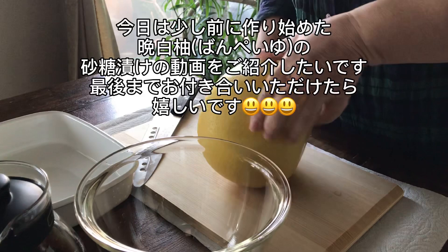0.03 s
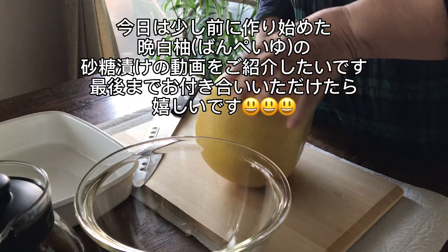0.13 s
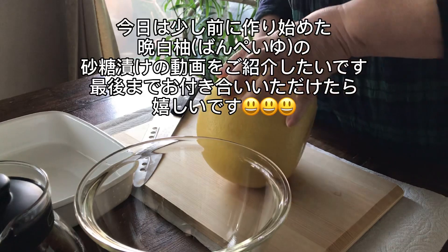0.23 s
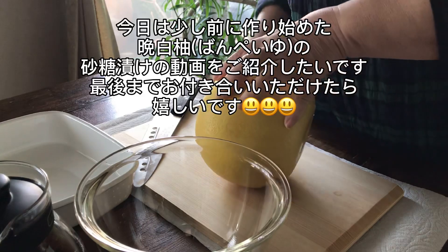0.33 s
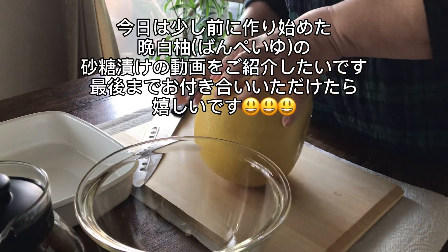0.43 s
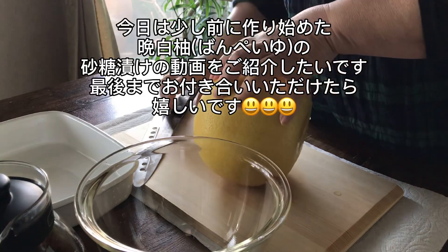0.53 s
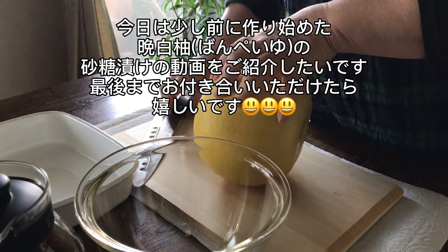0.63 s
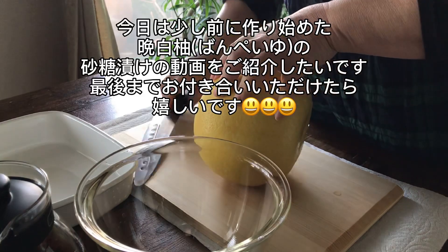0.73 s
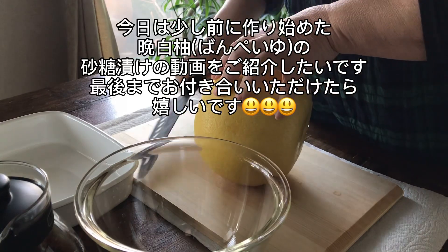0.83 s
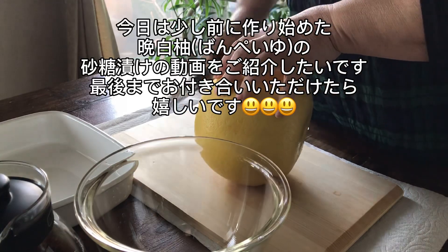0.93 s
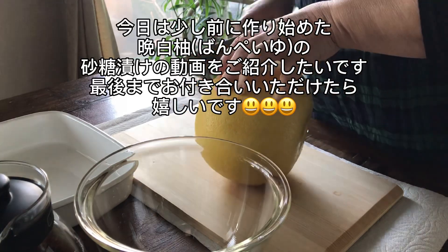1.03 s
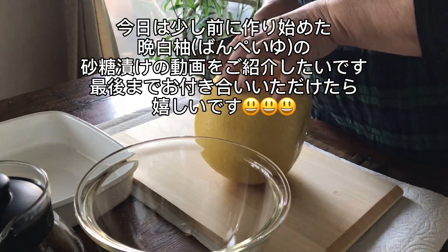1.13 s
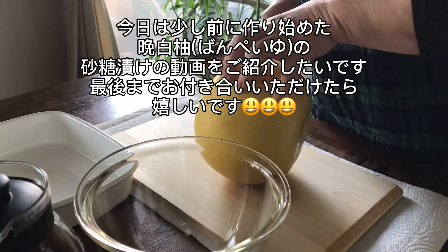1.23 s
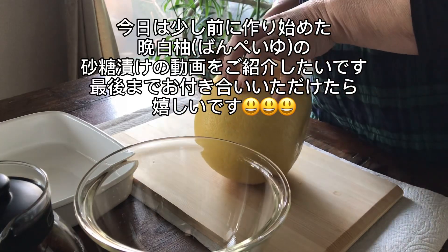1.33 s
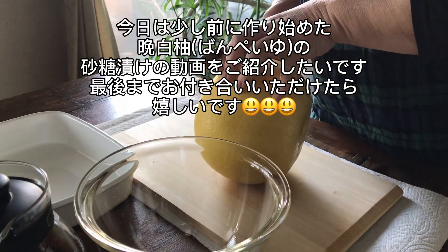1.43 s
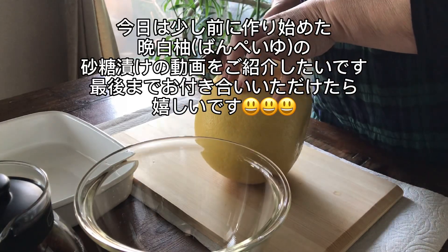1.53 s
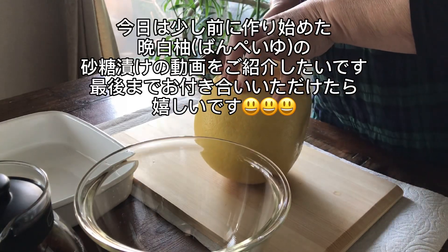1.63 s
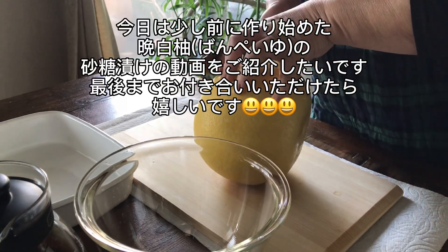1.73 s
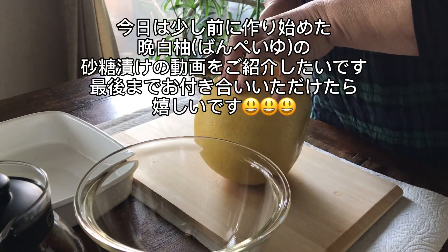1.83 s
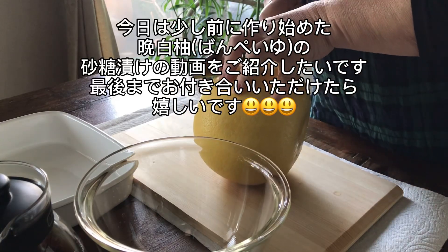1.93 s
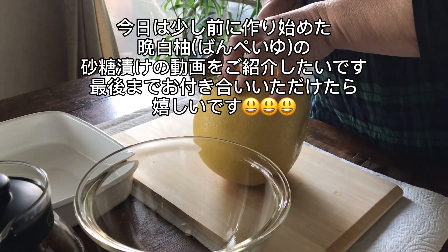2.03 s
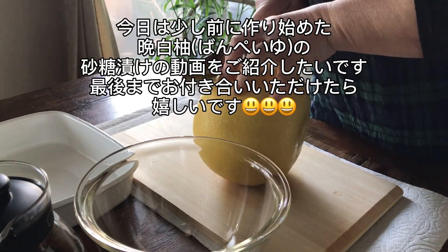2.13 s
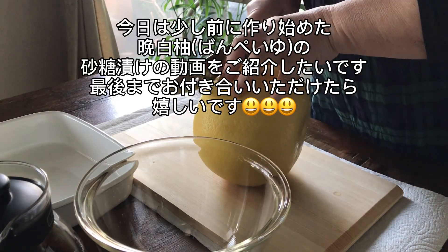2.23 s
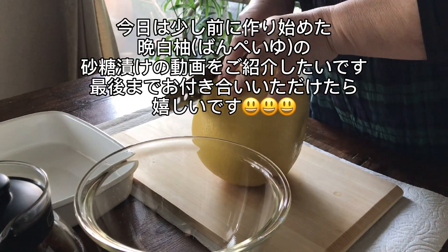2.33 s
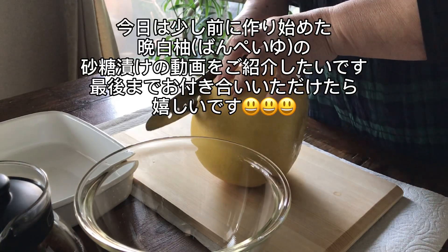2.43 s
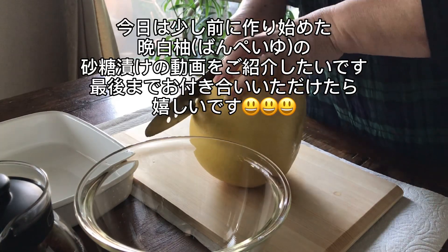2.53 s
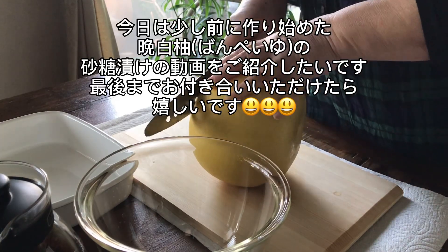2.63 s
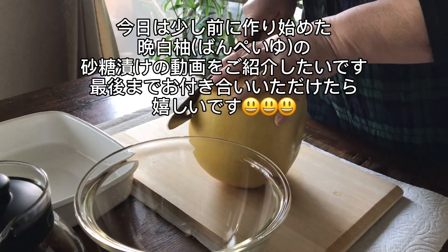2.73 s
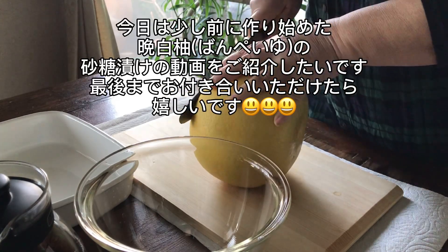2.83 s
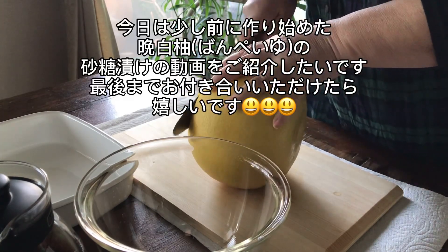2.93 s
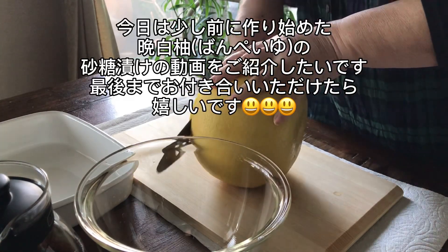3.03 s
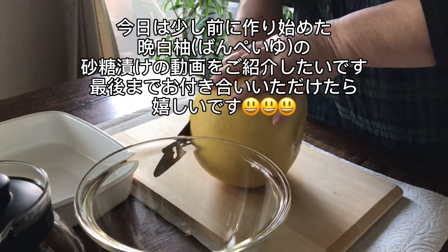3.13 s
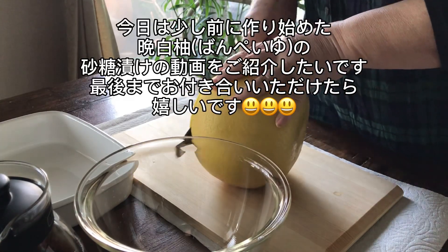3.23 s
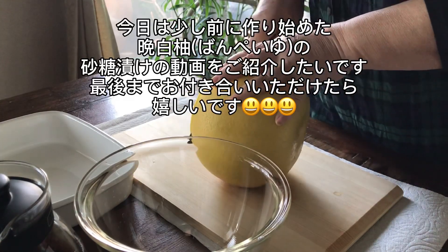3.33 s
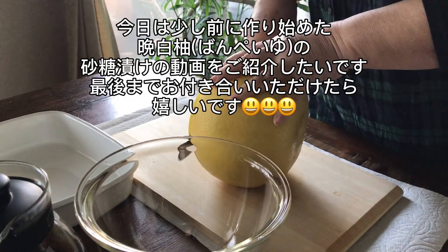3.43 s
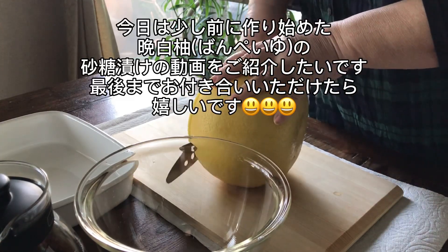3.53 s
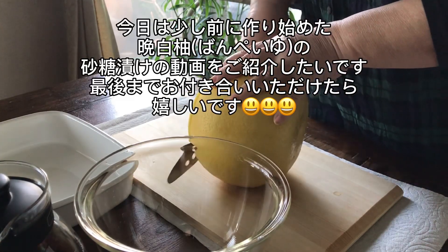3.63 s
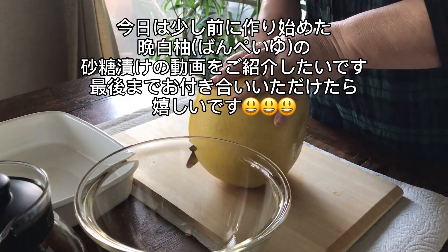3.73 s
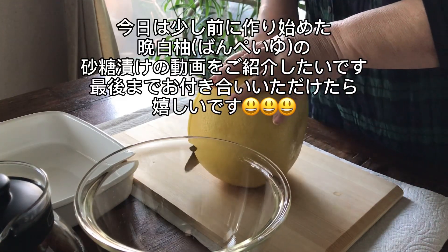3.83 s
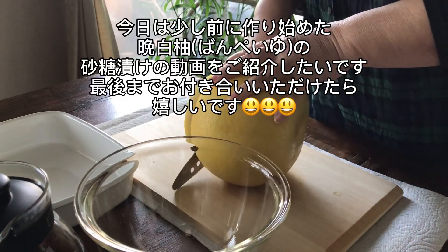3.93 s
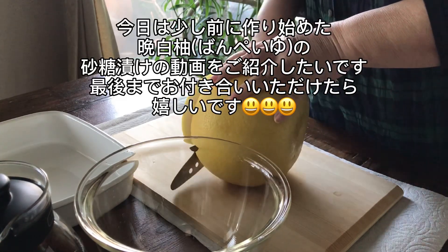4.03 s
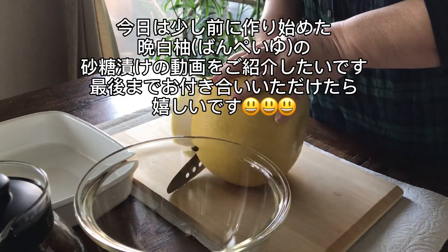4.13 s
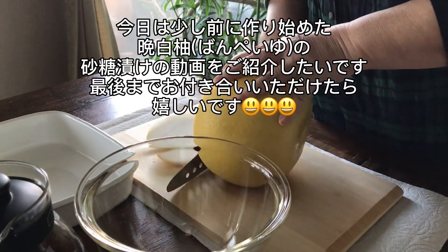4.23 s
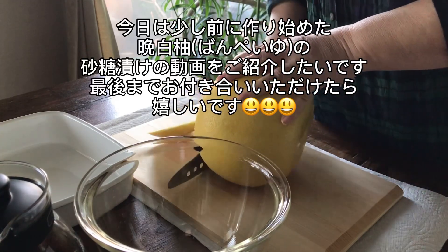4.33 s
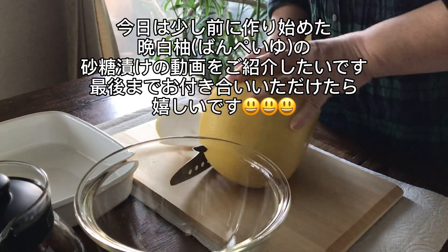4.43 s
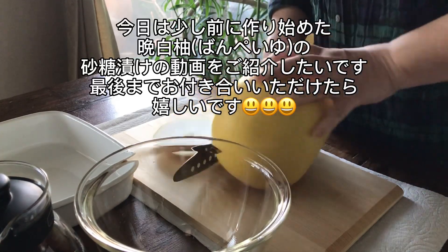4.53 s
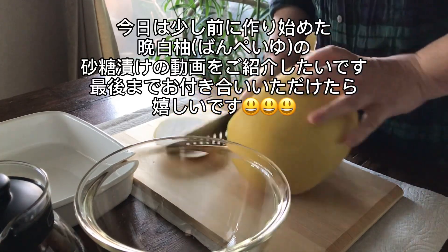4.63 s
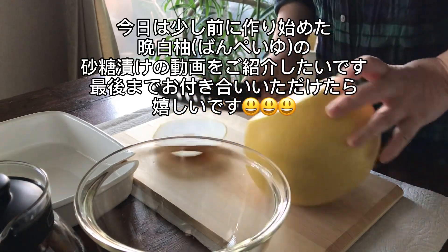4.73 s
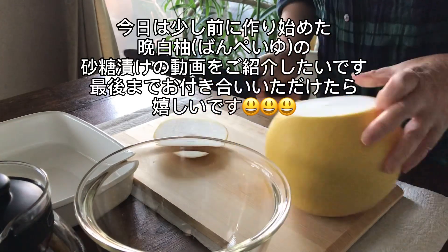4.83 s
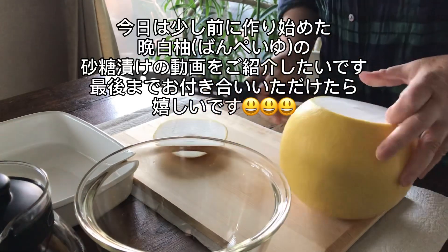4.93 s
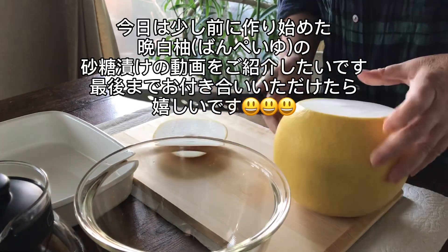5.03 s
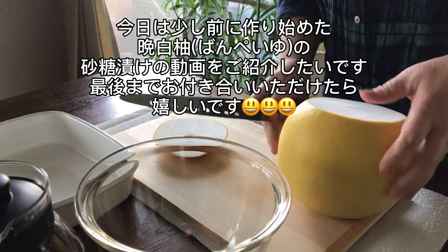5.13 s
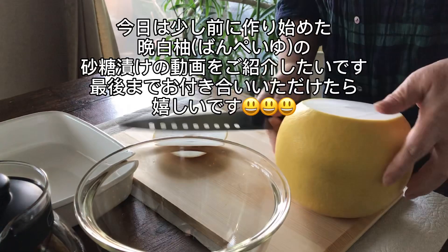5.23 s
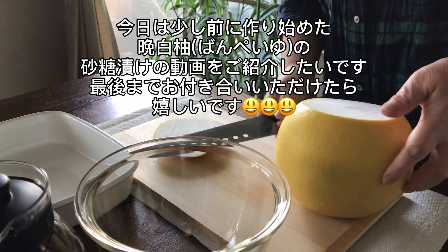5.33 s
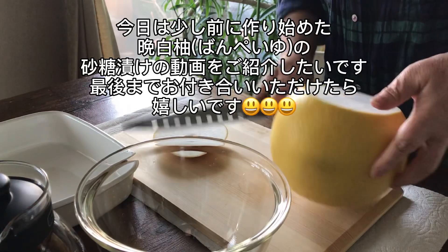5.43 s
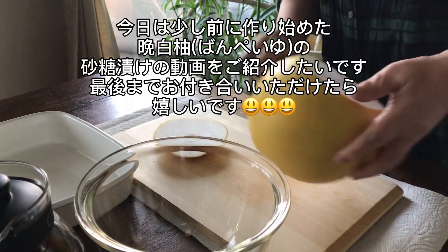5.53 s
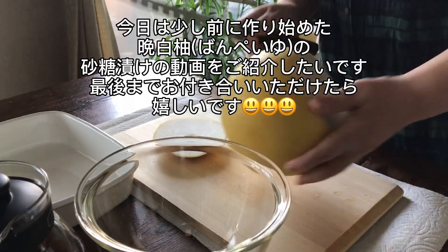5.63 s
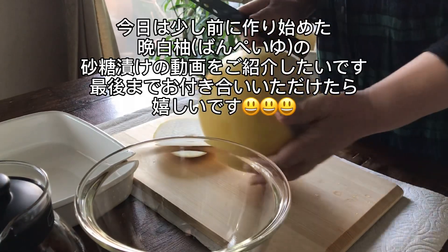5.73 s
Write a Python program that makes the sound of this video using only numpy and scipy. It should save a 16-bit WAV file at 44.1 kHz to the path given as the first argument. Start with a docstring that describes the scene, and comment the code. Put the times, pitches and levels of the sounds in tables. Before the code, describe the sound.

Close view of a quiet home kitchen with low room murmur. Hands softly rub and shift a heavy fruit on a wooden board, with a faint double tap. After about two seconds a knife saws in short, uneven, crunchy rasps with damp hiss. Two hard knocks at the end of the cut and a clacking landing follow, then small taps and dull shifting as the fruit is moved.

```python
"""Soft rubbing of hands on a large fruit opens the scene; then a knife saws through its thick rind in a kitchen.
The strokes are trains of random slips with scrape and wet hiss, each with its own arch of force.
Knocks, and landings of fruit and cut cap on the wooden board, are short pushes into dying modes, with bright ticks.
Shaped grains and noise make the hands, the low table rumble and a faint thin whistle.
Sparse echoes make the quiet kitchen, and drifting noise its air."""
import sys
import numpy as np
from scipy import signal
from scipy.fft import rfft, irfft
from scipy.io import wavfile
from scipy.ndimage import uniform_filter1d

SR = 44100
rng = np.random.default_rng(int(sys.argv[2]) if len(sys.argv) > 2 else 0)


def store_pcm(level_fs):
    """Save levels as 16-bit WAV."""
    pcm = np.round(np.clip(level_fs, -1, 1) * 32767).astype(np.int16)
    wavfile.write(sys.argv[1], SR, np.atleast_2d(pcm).T)


N = 254898  # length in samples

# strokes of the knife: start_s, rise_s (to full force), fall_s (from there to the stop), force_db,
# first_db and last_db (force missing at start and stop), scrape_db and hiss_db (relative to the force),
# wood (share of the edge on wood, 0-1)
KNIFE_STROKES = [ (2.07, 0.13, 0.014, -58, 19, 11, -12.5, -7, 0),
                 (2.19, 0.033, 0.036, -50, 9, 0.5, -11.5, -12, 0),
                 (2.26, 0.072, 0.091, -41.5, 5.5, 15, -13.5, -14, 0.19),
                 (2.44, .025, 0.026, -66, 4, 6, -5, -2, 0.45),
                 (2.53, 0.053, 0.028, -62.5, 6, 4, -10, -6, 0.6),
                 (2.611, 0.16, 0.03, -54, -0.5, 14, -6.5, -8, 0),
                 (2.867, 0.097, 0.095, -41.5, 14.5, 17, -9.5, -14, 0),
                 (3.128, 0.14, 0.036, -57, 3, 13, -11, -12.5, 0.04),
                 (3.342, 0.078, 0.11, -43, 13, 8, -14, -20, 0.14),
                 (3.6, .1, 0.027, -54, 3, 1.5, -13.5, -16.5, 0.09),
                 (3.781, 0.059, 0.019, -43, 13, -2, -15.5, -25, 0.25),
                 (3.87, 0.03, 0.044, -37, -6, 13, -17.5, -24, 0.75),
                 (3.999, 0.056, 0.018, -46.5, 17, -3.5, -21.5, -29, 0.5),
                 (4.074, 0.047, 0.048, -43.5, -3, 19, -12, -20.5, 0.7), ]
# slips shaking the fruit: pitch_hz, relative level_db (per Hz)
SLIP_SPECTRUM = [(35, -41), (60, -8), (123, -3.5), (163, -5.5), (256, -3), (372, -0.5), (643, -2),
                 (1470, -15.5), (1670, -17), (2500, -23), (3250, -37), (5500, -120)]
# blade scraping in the rind: pitch_hz, relative level_db (per Hz)
RIND_SCRAPE_SPECTRUM = [(900, -27), (1650, 5), (2150, -1.5), (2600, 4), (2950, 2), (3300, 1.5), (4000, 2),
                        (4600, 0.5), (5200, -3.5), (5870, -2), (7200, -7.5), (9500, -15)]
# blade edge against wood: pitch_hz, width_hz (of one filter pass), relative level_db
WOOD_EDGE_PEAKS = [(2880, 3000, 2), (4130, 180, 6), (5050, 470, 6), (5870, 200, 5), (6900, 680, 0.5),
                   (8500, 590, -10)]
# bursting cells, also skin on rind: pitch_hz, relative level_db (per Hz)
HISS_SPECTRUM = [(3000, -24), (6000, -4), (9000, -0.5), (12500, 0), (14500, -3), (16000, -3.5)]

# jolts through fruit and board: start_s, blow_db (dry peak), contact_ms, boom_db (before the soft rise)
BODY_KNOCKS = [(.658, -40.5, 4.9, -68), (2.067, -39, 2.1, -37), (2.194, -46, 2, -41.5),
               (2.337, -38.5, 1.1, -45), (2.615, -54, 1.3, -63), (2.976, -35, 0.67, -34.5),
               (2.985, -34, 2.9, -43), (3.602, -49, 1.4, -78), (3.797, -43, 2.3, -63),
               (3.8755, -20, 1.29, -33), (4.0757, -20, 1.33, -70), (4.097, -32, 1.5, -60),
               (4.227, -31, 1.9, -48), (4.27, -43.5, 1.8, -55), (5.496, -43, 4.8, -62),
               (5.632, -40, 1.03, -55)]
# the fruit, then the cap, then the fruit again, landing on the board: start_s, tick_db (dry peak),
# cycle_ms (one push and rebound), boom_db (before the soft rise)
BOARD_LANDINGS = [(.552, -47.5, 0.41, -65), (.657, -43, 0.46, -54), (4.203, -41.5, 0.51, -71),
                  (4.221, -51, 0.75, -61), (4.2265, -21.5, 0.47, -22.5), (4.268, -42, 0.23, -56),
                  (4.379, -33.5, 0.52, -28), (4.385, -34, 0.32, -44), (4.508, -37.5, 0.46, -37.5),
                  (4.61, -42, 0.37, -34.5), (4.699, -45.5, 0.35, -49), (4.77, -54, 0.31, -75),
                  (4.887, -39.5, 0.68, -37)]
# what fruit and board ring with: pitch_hz, relative level_db, t60_s
BODY_MODES = [(202, -5, 0.071), (250, -4, 0.05), (333.6, 13.5, 0.037), (513, -25, 0.074), (552, 6, 0.029),
              (804, -12.5, 0.11), (1130, -2, 0.033), (1540, -8, 0.038)]
# what the landings ring with, tuned to the cap: pitch_hz, relative level_db, t60_s
CAP_MODES = [(532, 26, 0.031), (1000, 15, 0.013), (1250, -7.5, 0.026), (1370, -11, 0.029),
             (1950, -13, 0.019), (2110, -3.5, 0.014), (2190, -24, 0.012), (2500, -2.5, 0.011),
             (3000, -4.5, .012), (4100, -4, 0.017)]
# lowest modes of the board on the table: pitch_hz, relative level_db, t60_s
BOARD_MODES = [(133, 0, .25), (167, -7, .2), (334, -20, .2), (118, -8, .2), (205, -12, .08)]
# small bright ticks of blade and fingernails: start_s, level_db (dry peak), centre_hz, width (share of centre)
BRIGHT_TICKS = [(.35, -61, 6000, .6), (.554, -56, 2330, .1), (.657, -53, 2820, 0.078),
                (.658, -51, 1640, .08), (1.157, -44, 13100, 0.54), (1.158, -56, 5830, 0.076),
                (1.16, -54, 4000, 0.55), (4.183, -56, 3480, 0.096), (4.226, -34.5, 6850, 0.55),
                (4.381, -47.5, 7700, 1), (4.785, -58, 5500, .4), (4.99, -58, 10000, .6),
                (5.049, -55, 3750, 0.79), (5.082, -59, 6600, .4), (5.12, -62, 4000, .6),
                (5.501, -53, 1450, .1), (5.25, -55.5, 10100, .6), (5.341, -52.5, 11500, 0.93),
                (5.646, -54, 2220, 0.073), (5.667, -49.5, 2550, 0.17)]

# hands touching and shifting the fruit: strongest_s, swell_s, fade_s,
# shift_db (dull shifting), brush_db (brushing on wood), skin_db (skin hiss)
HAND_TOUCHES = [ (.062, 0.09, .06, -78, -72, -64), (.2, 0.12, .06, -86, -79, -70),
                (.266, 0.067, 0.029, -62, -83, -82), (0.554, 0.034, 0.17, -59, -63.5, -70),
                (.62, 0.092, 0.071, -84, -66, -84), (0.663, .02, 0.084, -51.5, -59.5, -74),
                (.775, 0.11, 0.043, -76, -73, -68), (.82, 0.054, 0.22, -69, -71, -93),
                (.95, 0.2, 0.21, -75, -75, -68.5), (1.11, .08, 0.6, -80, -77, -87),
                (1.51, 0.056, .1, -67.5, -84, -70), (2.034, 0.067, 0.18, -68, -81, -80),
                (4.26, 0.21, 0.18, -55.5, -65.5, -90), (4.85, 0.75, 0.096, -70, -81, -77),
                (4.888, 0.053, 0.049, -55, -61.5, -82), (4.985, .08, .08, -72, -78, -73),
                (5.08, 0.091, 0.33, -67.5, -81, -74.5), (5.355, 0.13, 0.024, -65.5, -78, -80),
                (5.505, 0.067, 0.23, -58, -77, -107), (5.64, 0.12, 0.1, -53, -78, -88),
                (5.67, 0.041, 0.1, -56, -60, -77), (5.73, 0.13, .25, -56, -77, -79), ]
# steady grip of the hands: shift_db, brush_db, skin_db
GRIP_DB = (-70.5, -78.5, -85.5)
# dull shifting of the fruit: pitch_hz, relative level_db (per Hz)
SHIFT_SPECTRUM = [(100, -5), (290, -1), (540, -3.5), (900, -10.5), (1500, -16.5), (3000, -72.5)]
# brushing on wood: pitch_hz, relative level_db (per Hz)
BRUSH_SPECTRUM = [(700, -4), (1500, 5.5), (2500, 1), (4000, -3.5), (6500, -8.5), (10000, -22)]
# low rumble through the table: pitch_hz, relative level_db (per Hz)
RUMBLE_SPECTRUM = [(25, -8), (36, -11.5), (49, -9.5), (65, -10.5), (95, -6), (140, -18), (300, -49)]
# loudness of that rumble over time: time_s, level_db
RUMBLE_LEVEL = [(0.0, -59.5), (0.89, -59), (1.72, -64.5), (2.4, -59.5), (2.83, -64.5), (2.99, -53),
                (3.27, -62), (3.85, -60), (3.9, -68), (3.99, -67), (4.09, -55), (4.18, -61), (4.23, -50),
                (4.4, -68), (4.44, -56.5), (4.96, -55), (5.59, -66.5), (5.78, -53.5)]
# loudness of a faint thin whistle: time_s, level_db
WHISTLE_LEVEL = [(.78, -95), (.81, -76), (1.0, -77), (1.05, -95)]
# resonance of the whistle: pitch_hz, width_hz (of one filter pass), relative level_db
WHISTLE_RESONANCE = [(3030, 90, 0)]

# dying time of the kitchen's echoes: pitch_hz, t60_s
KITCHEN_DECAY = [(120, 0.36), (300, 0.29), (1000, 0.2), (4000, 0.11), (12000, 0.09)]
# murmur of the house and microphone hiss: pitch_hz, relative level_db (per Hz)
AIR_SPECTRUM = [(20, -15), (45, -3.5), (95, -2), (200, -4), (330, -7.5), (500, -21), (1000, -16),
                (1600, -23), (3200, -29), (6300, -33.5), (12500, -37), (16000, -42)]
# dips of the microphone housing: pitch_hz, width_hz, gain_db
HOUSING_DIPS = [(4960, 97, -5.5), (7650, 500, -4), (10320, 770, -5.5)]

BITE_S, LET_GO_S = 0.0096, 0.013  # the blade grips quickly and slides to rest
ROUNDING = 1.72  # 1 = pointed top of the force, 2 = round arch
HISS_LEAD_S = 0.014  # the hiss is fullest a little before the force
SCRAPE_FOLLOWS, HISS_FOLLOWS = 1, 1  # share of the force swing in dB that scrape and hiss take
BOOM_RISE_S = .005  # the heavy board takes a moment to move
LANDING_CYCLES = 2.6  # length of a landing in push-and-rebound cycles
TOUCH_RANGE_DB = 31  # how far a touch swells and fades over its times
AIR_DB = -61
BAND_LIMIT_HZ = 15750


def saw():
    """One-way slips of the blade shake the fruit; the edge scrapes and bursting cells hiss."""
    slips = grains(1200, 2.0, signed=False)
    # against the wood every slip is a small soft blow on fruit and board
    nudge = np.exp(-((np.arange(90) / SR - .001) / .00009) ** 2)
    on_wood = evened(signal.oaconvolve(slips, np.convolve(ring(BODY_MODES), nudge))[:N])
    in_rind = coloured(slips, SLIP_SPECTRUM)

    grit = grains(6000, 0.6)
    rind_scrape = patchy(coloured(grit, RIND_SCRAPE_SPECTRUM), patchy_db=2.5)
    wood_scrape = patchy(resonant(grit, WOOD_EDGE_PEAKS), patchy_db=4.0)
    wet_hiss = patchy(coloured(grains(14000, 3.1), HISS_SPECTRUM), patchy_db=1.0)

    out = np.zeros(N)
    for start, rise, fall, force_db, first_db, last_db, scrape_db, hiss_db, wood in KNIFE_STROKES:
        span = slice(round(start * SR), round((start + rise + fall + 6 * LET_GO_S) * SR))
        t = np.arange(N)[span] / SR - start
        wood = np.clip(wood, 0, 1)
        grip = np.minimum(t / BITE_S, 1)
        release = np.exp(-np.maximum(t - rise - fall, 0) / LET_GO_S)
        swing_db = swing(t, rise, fall, first_db, last_db)
        early_db = swing(t + HISS_LEAD_S, rise, fall, first_db, last_db)
        body = (1 - wood) * in_rind[span] + wood * on_wood[span]
        scrape = (1 - wood) * rind_scrape[span] + wood * wood_scrape[span]
        stroke = body * amp(swing_db)
        stroke += scrape * amp(scrape_db + SCRAPE_FOLLOWS * swing_db)
        stroke += wet_hiss[span] * amp(hiss_db + HISS_FOLLOWS * early_db)
        out[span] += amp(force_db) * grip * release * stroke
    return out


def swing(t, rise, fall, first_db, last_db):
    """Arch of a stroke's force, in dB relative to its force level."""
    rising = first_db * abs(1 - t / rise) ** ROUNDING
    falling = last_db * np.clip((t - rise) / fall, 0, 1.5) ** ROUNDING
    return -np.where(t < rise, rising, falling)


def blows(events, modes, turns):
    """Each blow rings its object, duller for a longer contact, and sets the board booming."""
    out, body, boom = np.zeros(N), ring(modes), ring(BOARD_MODES, .5)
    boom *= 1 - np.exp(-np.arange(len(boom)) / SR / BOOM_RISE_S)
    for s, db, ms, boom_db in events:
        cycles = np.arange(1, 400) / (ms * SR / 1000)
        # push and rebounds under a smooth window
        push = np.sin(2 * np.pi * cycles) * np.sin(np.pi * np.minimum(cycles / turns, 1)) ** 2
        sound = np.convolve(body, push)
        add(out, s, -amp(db) * sound / abs(sound).max())
        add(out, s, amp(boom_db) * boom)
    return out


def ticks():
    """Short noise snaps around a centre pitch; narrow ones ring a little."""
    out, t = np.zeros(N), np.arange(600) / SR
    for s, db, hz, share in BRIGHT_TICKS:
        burst = rng.standard_normal(600) * np.exp(-t / 0.0022)
        edges = [hz * (1 - share / 2), min(hz * (1 + share / 2), 18000)]
        snap = signal.lfilter(*signal.butter(2, edges, "band", fs=SR), burst)
        add(out, s, amp(db) * snap / abs(snap).max())
    return out


def hands():
    """The fruit rolls a little, brushes the wood, and skin slides on the rind, all as coloured grains."""
    shifting = coloured(grains(1500, 3.06), SHIFT_SPECTRUM)
    brushing = coloured(grains(5000, 0.96), BRUSH_SPECTRUM)
    skin = coloured(grains(11000, 3.6), HISS_SPECTRUM)
    gains = amp(GRIP_DB)[:, None] * np.ones(N)
    for s, swell, fade, *layer_db in HAND_TOUCHES:
        span = slice(max(round((s - 2 * swell) * SR), 0), round((s + 2 * fade) * SR))
        t = np.arange(N)[span] / SR - s
        touch = amp(TOUCH_RANGE_DB * np.minimum(t / swell, -t / fade))
        gains[:, span] += amp(layer_db)[:, None] * touch
    return (gains * [shifting, brushing, skin]).sum(0)


def table_rumble():
    """Low noise through the table, rising and sinking along its level curve."""
    return coloured(rng.standard_normal(N), RUMBLE_SPECTRUM) * amp(along(RUMBLE_LEVEL)[0])


def whistle():
    """Noise in one narrow resonance."""
    return resonant(rng.standard_normal(N), WHISTLE_RESONANCE) * amp(along(WHISTLE_LEVEL)[0])


def kitchen(x):
    """Sparse echoes of random sign, each band dying at its own speed."""
    taps = np.zeros(SR // 2)
    at = np.arange(150, SR // 2 - 20, 20)
    taps[at + rng.integers(0, 20, len(at))] = rng.choice([-1., 1.], len(at))
    hz, t, z = signal.stft(taps, SR, nperseg=256)
    decay = amp(-60 * t / read(KITCHEN_DECAY, hz)[:, None])
    tail = signal.istft(z * decay, SR, nperseg=256)[1]
    return signal.fftconvolve(x, tail / np.linalg.norm(tail))[:N]


def room_air():
    """Steady low murmur of the house and microphone hiss, drifting in patches."""
    frames, hz = N // 256 + 5, np.fft.rfftfreq(1024, 1 / SR)
    a, b, patches = rng.standard_normal((frames, 513, 3)).T
    patches = evened(uniform_filter1d(uniform_filter1d(patches, 10, 0), 14, 1))
    z = (a + 1j * b) * amp(read(AIR_SPECTRUM, hz)[:, None] + 1.0 * patches)
    return amp(AIR_DB) * evened(signal.istft(z, nperseg=1024, noverlap=768)[1][:N])


def grains(per_s, spread_db, signed=True):
    """Random clicks, most small and a few large; one-way clicks have their mean removed."""
    size = amp(spread_db * np.minimum(rng.exponential(1, N), 4))
    size *= rng.random(N) < per_s / SR
    return size * rng.choice([-1., 1.], N) if signed else size - size.mean()


def ring(modes, length=.4):
    """Sum of dying sines, peak 1."""
    t = np.arange(round(length * SR)) / SR
    x = sum(amp(db - 60 * t / t60) * np.sin(2 * np.pi * hz * t) for hz, db, t60 in modes)
    return x / abs(x).max()


def coloured(x, points):
    """Causal minimum-phase filter with the given spectrum, evened to unit RMS."""
    log_gain = read(points, abs(np.fft.fftfreq(8192, 1 / SR))) * np.log(10) / 20
    taps = np.fft.ifft(np.exp(np.conj(signal.hilbert(log_gain)))).real[:4096]
    return evened(signal.oaconvolve(x, taps)[:N])


def resonant(x, peaks):
    """Sum of steep resonances, each a two-pole filter passed twice, evened to unit RMS."""
    out = 0
    for hz, width, db in peaks:
        b, a = signal.iirpeak(hz, hz / width, SR)
        out = out + amp(db) * signal.lfilter(b, a, signal.lfilter(b, a, x))
    return evened(out)


def patchy(x, patchy_db):
    """Lets bands of scrape and hiss swell and fade at random."""
    z = signal.stft(x, nperseg=256, noverlap=192)[2]
    field = rng.standard_normal(z.T.shape).T
    field = evened(uniform_filter1d(uniform_filter1d(field, 4, 0), 30, 1))
    return evened(signal.istft(z * amp(patchy_db * field), nperseg=256, noverlap=192)[1][:N])


def amp(db):
    """Decibels to a linear factor."""
    return 10 ** (np.asarray(db) / 20)


def evened(x):
    """Scales to unit RMS."""
    return x / np.sqrt(np.mean(x ** 2) + 1e-20)


def read(points, hz):
    """Value of a curve at each frequency, straight on a log pitch axis."""
    f, value = np.transpose(points)
    return np.interp(np.log(hz + 1), np.log(f + 1), value)


def along(rows):
    """Columns of a dB curve at every sample, -99 dB outside its span."""
    s, *columns = np.transpose(rows)
    return [np.interp(np.arange(N) / SR, s, c, left=-99, right=-99) for c in columns]


def add(mix, s, sound):
    """Lays a sound into the mix at s seconds, cut at the end."""
    part = mix[round(s * SR):][:len(sound)]
    part += sound[:len(part)]


def scene():
    """Direct sounds, their kitchen echoes with more send from the hits, and the room's air."""
    rubbing = saw() + hands() + table_rumble() + whistle()
    knocks = blows(BODY_KNOCKS, BODY_MODES, turns=0.99)
    landings = blows(BOARD_LANDINGS, CAP_MODES, turns=LANDING_CYCLES)
    hits = knocks + landings + ticks()
    echoes = kitchen(amp(-12) * rubbing + amp(-7.5) * hits)
    return (rubbing + hits + echoes + room_air())[None]


def record(dry):
    """Dips of the microphone housing and bass cut, then the band limit."""
    hz = np.fft.rfftfreq(N, 1 / SR)
    colour_db = sum(db / (1 + (2 * (hz - f) / w) ** 2) for f, w, db in HOUSING_DIPS)
    heard = irfft(rfft(dry) * amp(colour_db), N)
    heard = signal.sosfilt(signal.butter(4, 29, "high", fs=SR, output="sos"), heard)
    band_limit = signal.firwin(801, BAND_LIMIT_HZ, window=("kaiser", 9), fs=SR)
    return signal.oaconvolve(heard, band_limit[None], "same")


dry = scene()
out = record(dry)
store_pcm(out)
```